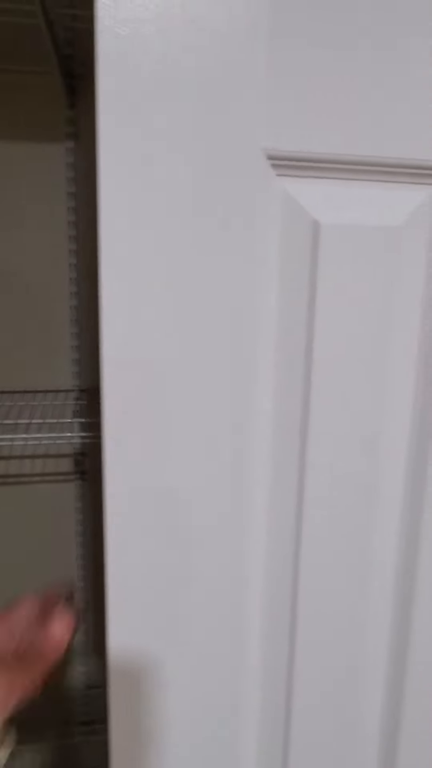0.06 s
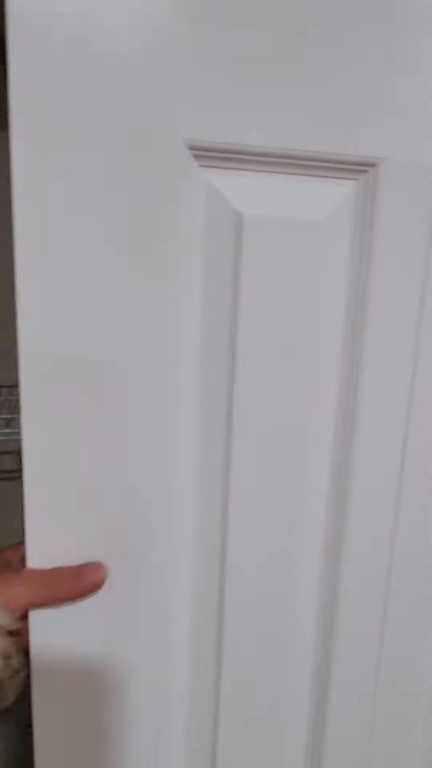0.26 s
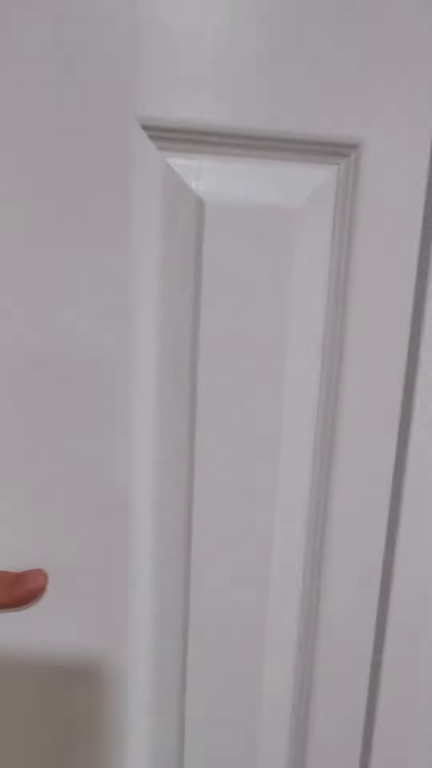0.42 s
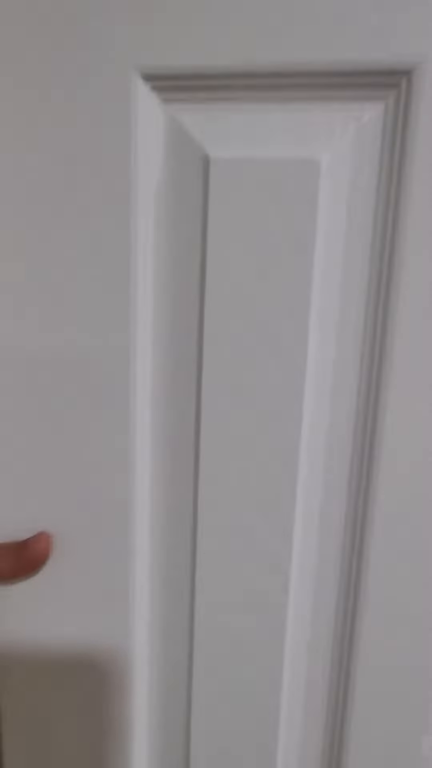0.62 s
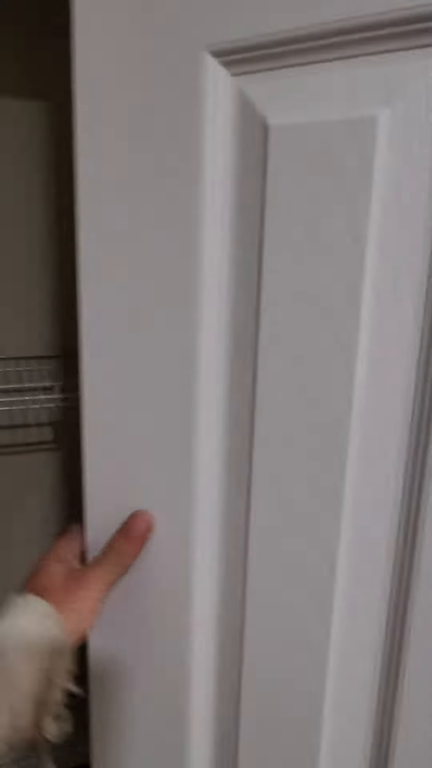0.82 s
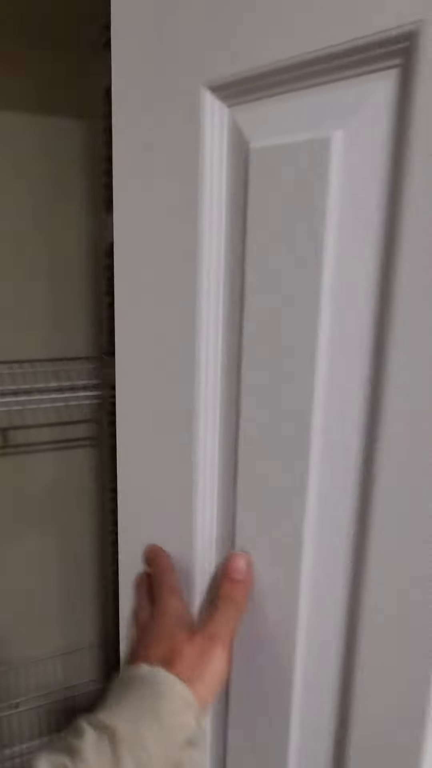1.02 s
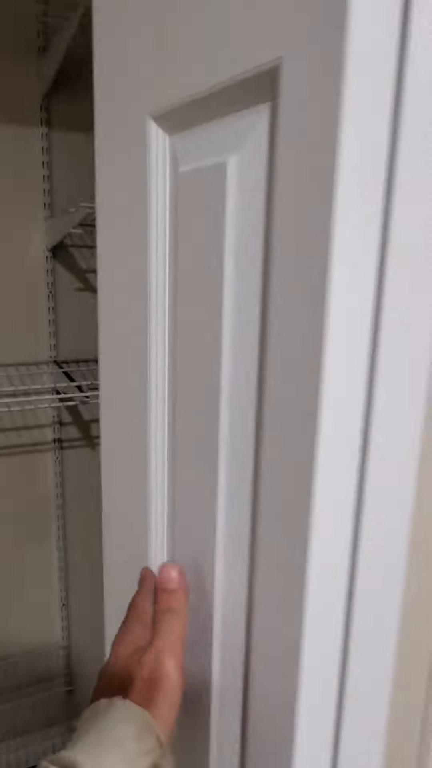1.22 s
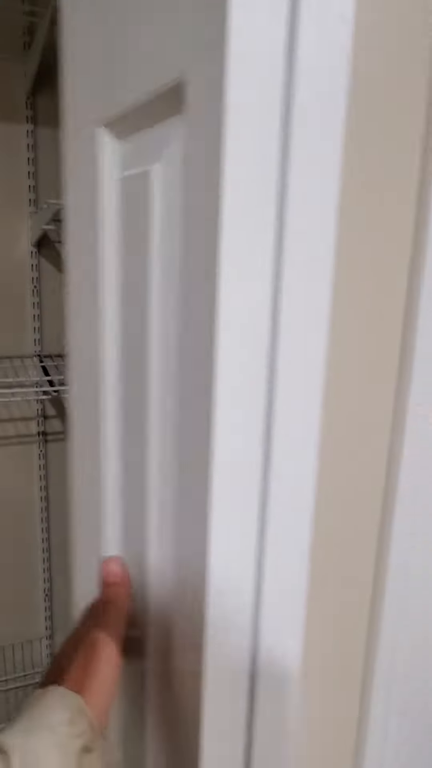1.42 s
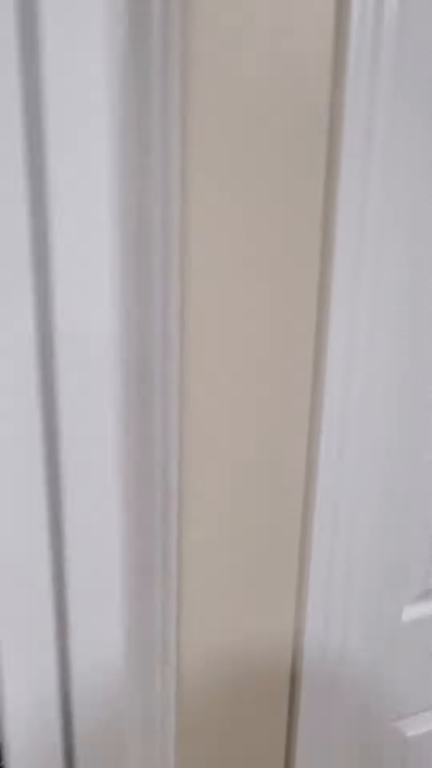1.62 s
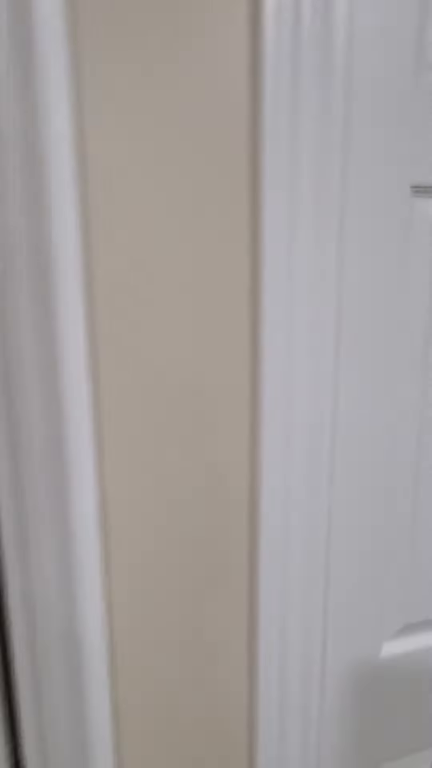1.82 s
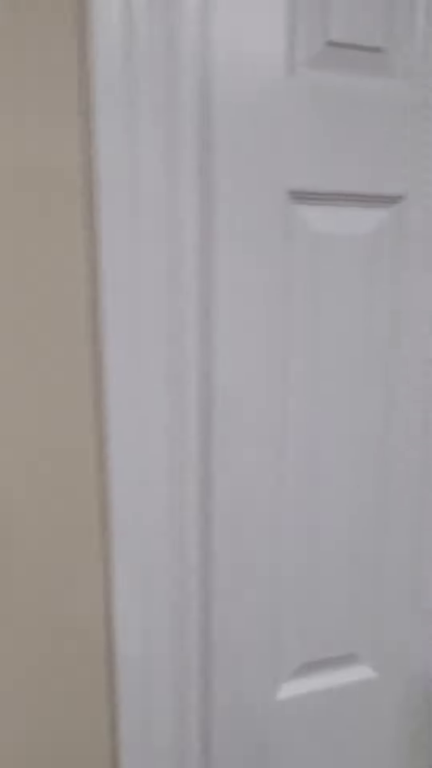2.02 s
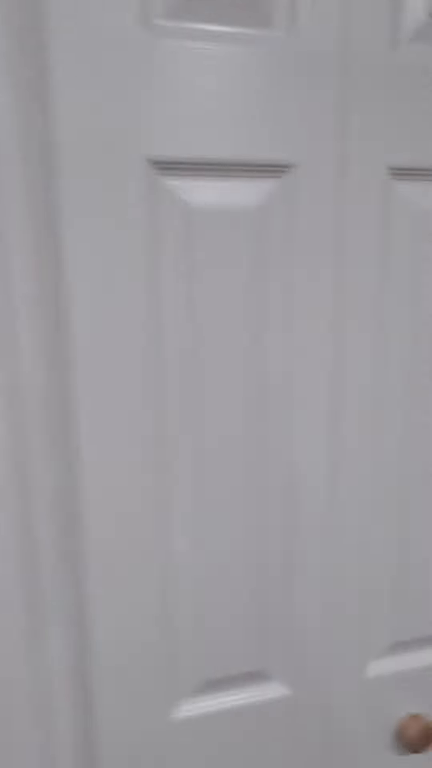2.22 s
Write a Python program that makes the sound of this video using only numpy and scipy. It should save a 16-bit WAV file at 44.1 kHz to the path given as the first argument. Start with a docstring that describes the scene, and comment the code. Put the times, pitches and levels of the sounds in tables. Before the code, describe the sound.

Folding closet door tugged open with a hollow thump, rattling slide, knocks and a metallic snap.

```python
"""A hollow bifold closet door is tugged open in a bare, ringing room.
The panels boom as they break free (0.2 s) and a hinge pin pings. The guide scrapes along its
track, shaking the panels; it catches (0.7 s) and groans (0.9 s). The leaves knock together as
they fold (1.4 s), a metal pivot snaps into place, its spring ringing on (1.7 s), and one light
knock follows (2.0 s)."""
import sys
import numpy as np
from scipy import signal
from scipy.fft import rfft, irfft
from scipy.io import wavfile

SR = 44100
rng = np.random.default_rng(int(sys.argv[2]) if len(sys.argv) > 2 else 0)


def pcm_store(signal):
    """Save signal as 16-bit PCM."""
    levels = np.round(np.clip(np.atleast_2d(signal), -1, 1) * 32767)
    wavfile.write(sys.argv[1], SR, levels.astype(np.int16).T)


N = 101430
T = np.arange(N) / SR
FREQS = np.maximum(np.fft.rfftfreq(N, 1 / SR), 1)


def knocks():
    """Blows ring the hollow panels; softness and place decide which modes answer."""
    # t/s, ring level/dB, boom level/dB, low-pass f/Hz, high-pass f/Hz
    blows = [(0.187, -26, -31.5, 90, 35), (0.2124, -13.5, -19, 604, 88), (.277, -37, -27, 910, 90),
             (.372, -44, -28.5, 109, 45), (0.496, -41, -35.5, 1200, 40), (.741, -35, -30, 400, 54.6),
             (1.013, -40, -46.5, 288, 40), (1.358, -27, -32.5, 1920, 250), (1.403, -28, -20, 183, 87.4),
             (1.406, -36, -30, 2500, 150), (1.445, -14, -31, 101, 49.6), (2.027, -62, -38.5, 3000, 184)]
    # panel modes: f/Hz, level/dB, t60/s
    panel_modes = [(63.5, -24, 0.32), (80.2, -16.5, 0.78), (182, -17, 0.32), (201.3, -7, 0.38),
                   (241.7, -9, 0.59), (277.6, 0.5, 0.39), (293, -9, 0.48), (343, -7.5, 0.27),
                   (437, -2.5, 0.34), (466, -14, 0.19), (485, -10.5, 0.71), (526, -17, 0.74),
                   (596, -40, .35), (651, -8.5, 0.32)]
    # dense ring of door and room: f/Hz, level/dB
    boom_spectrum = [(25, -7), (50, -1), (85, 3), (120, -12), (180, -9.5), (270, -6), (450, -8), (600, -11),
                     (1000, -17), (2000, -20), (5000, -41)]
    boom_boost_db = 4
    out = 0
    for start_s, ring_db, boom_db, lowpass_hz, highpass_hz in blows:
        contact = 1 / np.sqrt((1 + (FREQS / lowpass_hz) ** 4) * (1 + (highpass_hz / FREQS) ** 4))
        modes = [(hz, db + 20 * np.log10(np.interp(hz, FREQS, contact)), t60_s)
                 for hz, db, t60_s in panel_modes]
        panel = direct(ring(modes, start_s, rise_s=0.0043))
        boom = diffuse(colour(boom_spectrum) * contact) * fade(start_s, t60_s=0.76, rise_s=0.0027)
        out = out + amp(ring_db) * panel + amp(boom_db + boom_boost_db) * boom
    return out


def flexes():
    """A pushed or struck leaf bends as a whole for a few cycles, giving the blow its punch."""
    # t/s, level/dB, f/Hz, rise/s, t60/s
    bends = [(.001, -34.5, 59, 0.0018, 0.19), (0.188, -22, 77, .02, 0.18),
             (0.2134, 5.5, 246, 0.0052, 0.038), (0.2143, -10, 448.6, .006, 0.12),
             (.277, -18.5, 278.6, 0.0043, 0.28), (.48, -32, 75.6, 0.017, 0.19),
             (0.649, -23, 72.4, 0.047, 0.35), (.742, -22.5, 168.2, 0.004, 0.21),
             (1.01, -33.5, 79.7, .008, .2), (1.224, -24, 77, 0.055, 0.29), (1.355, -27, 283, 0.011, 0.18),
             (1.399, -15.5, 169, 0.0088, 0.27)]
    return direct(sum(ring([(hz, db, t60_s)], start_s, rise_s)
                      for start_s, db, hz, rise_s, t60_s in bends))


def clacks():
    """Leaf edges meet, wood on wood, with a short dry clack."""
    # t/s, level/dB
    contacts = [(0.2192, -27), (0.496, -28.5), (0.738, -27), (1.3555, -39), (1.362, -27.5), (1.395, -33),
                (1.7195, -33), (2.0276, -32.5)]
    # f/Hz, level/dB
    spectrum = [(100, -14), (220, -2), (520, -1), (800, -1.5), (1500, -3), (2200, -10), (5000, -9),
                (15000, -40)]
    envelope = sum(amp(db) * fade(start_s, t60_s=0.065, rise_s=0.0013) for start_s, db in contacts)
    return diffuse(colour(spectrum)) * envelope


def pivot():
    """The metal pivot snaps home with a double contact; its spring and the room ring on."""
    # t/s, level/dB
    contacts = [(1.719, -14), (1.7199, -3.5)]
    # f/Hz, level/dB, t60/s
    pivot_modes = [(3410, -0.5, 0.0089), (3930, -3.5, 0.01), (5760, -7, 0.0084), (6240, -6.5, 0.0053),
                   (10500, -5, 0.0025), (14000, -5, 0.0041)]
    # f/Hz, level/dB, t60/s
    spring_modes = [(3060, -0.5, 0.55), (3390, -1, 0.75), (3310, 2, 0.89), (3353, -12, 0.72),
                    (3485, -10, 0.77), (3520, -12, 0.67), (3740, -7, 0.97), (3977, -12, 1.0),
                    (5500, -11, 0.99), (5803, -11, 1)]
    # f/Hz, level/dB
    tail_spectrum = [(150, -27), (500, -13), (1400, -11), (2300, -13.5), (2950, -6), (3260, 3.5),
                     (3650, -1.5), (3830, -4), (4030, -4.5), (4400, -8.5), (5000, -5), (5550, -4),
                     (6200, -11.5), (6700, -10), (7300, -13), (7750, -12.5), (8800, -20), (10700, -17),
                     (11700, -21), (13750, -11.5), (15000, -17), (16000, -26)]
    first_s = contacts[0][0]
    snap = sum(amp(db) * ring(pivot_modes, start_s, rise_s=0.00035) for start_s, db in contacts)
    spring = amp(-34) * ring(spring_modes, first_s, rise_s=0.001) * pan(left_db=2)
    tail = amp(-22) * room_tail(click(first_s, colour(tail_spectrum)))
    return direct(snap, left_db=11.5) + spring + tail


def ticks():
    """Play in the pivots and hinges makes them click."""
    # t/s, crack level/dB, room level/dB, tilt/(dB/octave), left-right/dB
    events = [(.103, -57, -61.5, -11.5, -7), (.191, -45, -47.5, -7.5, 3), (0.2053, -48, -52, 10, 6),
              (.2216, -25.5, -41, 0, 12), (.2745, -22.5, -40, -6, 1.5), (.494, -34, -45.5, -4.5, 8),
              (0.504, -33, -55, -3, 5), (1.3648, -22.5, -41, 4, -2), (1.3968, -21.5, -33.5, -4.5, 10.5),
              (1.4025, -23, -50, -6, -2), (1.408, -26, -50, -5, -5), (1.638, -37, -51.5, -6, 6)]
    # f/Hz, level/dB
    spectrum = [(300, 0), (1200, -4.5), (2500, -0.5), (3600, 5), (5000, 1.5), (6800, -1.5), (8500, -9),
                (11500, -5), (15500, -3.5)]
    return cracks(events, spectrum)


def catches():
    """The guide clicks as it catches in the track."""
    # t/s, crack level/dB, room level/dB, tilt/(dB/octave), left-right/dB
    events = [(.6785, -25.5, -47, -1.5, 3), (.734, -20.5, -39.5, -3, 4.5), (1.0125, -34, -46.5, 1, 2)]
    # f/Hz, level/dB
    spectrum = [(500, -14), (1800, -6), (2800, -16), (3700, 1), (4250, -5), (4700, 9.5), (5300, -4.5),
                (6000, 5), (6800, -4), (8200, -8), (15500, -9)]
    return cracks(events, spectrum)


def hinge_ping():
    """A hinge pin slips with a thin ping."""
    # f/Hz, level/dB
    spectrum = [(2500, -31), (4600, -7), (5600, 2.5), (6100, -1), (6900, 4), (8100, -3), (9500, -1.5),
                (10300, 1), (10900, -6), (11700, 4), (12800, -6), (13500, 0), (15500, -1)]
    start_s, crack_db, room_db, tilt_db_per_oct, left_db = 0.3085, -20, -32.5, 0, -10
    return cracks([(start_s, crack_db, room_db, tilt_db_per_oct, left_db)], spectrum)


def cracks(events, spectrum):
    """Hardware contacts: short noise bursts, each with its wash in the room."""
    bursts, room_feed = 0, 0
    treble_oct = np.log2(np.maximum(FREQS, 1500) / 5000)
    for start_s, crack_db, room_db, tilt_db_per_oct, left_db in events:
        gain = colour(spectrum) * amp(tilt_db_per_oct * treble_oct)
        burst = 2 * shape(rng.standard_normal(N), gain) * fade(start_s, t60_s=0.009, rise_s=0.0006)
        bursts = bursts + amp(crack_db) * direct(burst, left_db)
        room_feed = room_feed + amp(room_db) * click(start_s, gain)
    return bursts + room_tail(room_feed)


def scrape():
    """The guide rubs grainily along the track."""
    # t/s, level/dB
    levels = [(.18, -83), (.24, -54), (.45, -50), (.58, -51), (.7, -40.5), (.77, -40.5), (.86, -37.5),
              (.92, -43), (1.0, -43), (1.035, -38), (1.16, -42), (1.32, -47), (1.45, -46), (1.7, -72),
              (2.3, -58.5)]
    # f/Hz, level/dB
    spectrum = [(500, -14), (2000, 2.5), (2800, -7.5), (3600, 2), (4250, 0.5), (4750, 5), (5500, 1.5),
                (6800, -0.5), (8200, -5), (9700, -6), (11000, -4), (15500, -4.5)]
    grain_db = 1.5 * jitter(rate_hz=500)
    return diffuse(colour(spectrum)) * amp(grain_db) * curve(levels) * pan(left_db=0.5)


def shudder():
    """The panels shake as they travel."""
    # t/s, level/dB
    levels = [(.15, -84), (.35, -37.5), (.6, -40.5), (.72, -36.5), (.87, -38.5), (.98, -40), (1.15, -40),
              (1.3, -38.5), (1.62, -41), (1.8, -40.5), (1.95, -63), (2.3, -68)]
    # f/Hz, level/dB
    spectrum = [(30, -31), (60, -4), (120, -8.5), (175, -1.5), (290, 0), (410, 1), (560, -7), (900, -11),
                (1800, -11), (2700, -20.5), (6000, -35)]
    return diffuse(colour(spectrum)) * curve(levels)


def groan():
    """The guide sticks briefly and sets one panel resonance humming unsteadily."""
    centre_s, sigma_s = 0.885, 0.042
    pitch_hz = 408 + 15.3 * jitter(rate_hz=90)
    hum = np.sin(2 * np.pi * np.cumsum(pitch_hz) / SR)
    swell = np.exp(-((T - centre_s) / sigma_s) ** 2 / 2)
    return direct(amp(-34.5) * hum * swell, left_db=-2.4)


def room_tail(clicks):
    """Clicks reverberate in the bare room, the treble dying first."""
    # f/Hz, t60/s
    decay_times = [(100, 1.4), (1000, 1.43), (3300, 1.06), (6000, 1.04), (9000, 0.91), (15000, 0.47)]
    hz, t60s_s = np.array(decay_times).T
    wash = rfft(diffuse(0.99))
    bands = [np.interp(np.log(FREQS), np.log(hz), row) for row in np.eye(len(hz))]
    response = sum(irfft(wash * band, N) * fade(0, t60_s, rise_s=0.001)
                   for band, t60_s in zip(bands, t60s_s))
    return signal.fftconvolve(response, clicks[None], axes=1)[:, :N]


def room_tone():
    """Faint steady noise of the quiet room."""
    # f/Hz, level/dB
    spectrum = [(25, -21), (62, -8.5), (110, -5.5), (400, -16), (900, -10), (2000, -19), (4500, -27.5),
                (8000, -40.5), (16000, -46)]
    return amp(-52.5) * diffuse(colour(spectrum))


def diffuse(gain):
    """Noise from all around: bass common to both sides, treble unrelated and mostly leaning left."""
    # f/Hz, left-right/dB
    balance = [(500, 0.1), (1100, -0.5), (2200, -0.5), (4500, 4), (8000, -1), (13000, 7)]
    common_below_hz = 530
    mid, side = rfft(rng.standard_normal((2, N))) * gain
    spread = np.clip(FREQS ** 2 / (FREQS ** 2 + common_below_hz ** 2) + 0.021, 0, 1)
    mid, side = mid * np.sqrt(1 - spread / 2), side * np.sqrt(spread / 2)
    hz, left_db = np.array(balance).T
    lean = amp(np.interp(np.log(FREQS), np.log(hz), left_db) / 2)
    return irfft(np.array([(mid + side) * lean, (mid - side) / lean]), N)


def direct(x, left_db=0):
    """Sound straight from the door arrives on the left first."""
    right_lag_s = 0.000402
    return np.array([x, np.interp(T - right_lag_s, T, x)]) * pan(left_db)


def ring(modes, start_s, rise_s):
    """Decaying modes set off together."""
    out = np.zeros(N)
    for hz, db, t60_s in modes:
        span = slice(*np.searchsorted(T, [start_s, start_s + t60_s]))
        tone = np.sin(2 * np.pi * hz * (T[span] - start_s))
        out[span] += amp(db) * tone * fade(start_s, t60_s, rise_s)[span]
    return out


def fade(start_s, t60_s, rise_s):
    """Quick rise, exponential decay."""
    age_s = np.maximum(T - start_s, 0)
    return (1 - np.exp(-age_s / rise_s)) * np.exp(-np.log(1000) * age_s / t60_s)


def click(start_s, gain):
    """One coloured impulse."""
    return shape(signal.unit_impulse(N, int(start_s * SR)), gain)


def jitter(rate_hz):
    """Gaussian random values joined by straight lines."""
    return np.interp(T * rate_hz, np.arange(N), rng.standard_normal(N))


def colour(rows):
    """Unit-power gain over frequency from rows of f/Hz, level/dB."""
    hz, db = np.array(rows).T
    gain = amp(np.interp(np.log(FREQS), np.log(hz), db))
    return gain / np.sqrt(np.mean(gain ** 2))


def curve(rows):
    """Gain over time from rows of t/s, level/dB."""
    return amp(np.interp(T, *np.array(rows).T))


def shape(x, gain):
    """Filter by a gain per frequency."""
    return irfft(rfft(x) * gain, N)


def pan(left_db):
    """Left and right gains."""
    return amp(np.array([[left_db], [-left_db]]) / 2)


def amp(db):
    """Decibels to gain."""
    return 10 ** (np.asarray(db) / 20)


def scene():
    """Wood, hardware and sliding over the quiet room."""
    wood = knocks() + flexes() + clacks()
    hardware = ticks() + catches() + hinge_ping() + pivot()
    sliding = scrape() + shudder() + groan()
    return wood + hardware + sliding + room_tone()


def record(dry):
    """High-pass, peak clip, steep low-pass."""
    highpass_hz, ceiling, lowpass_hz = 10, 0.88, 15900
    highpass = signal.butter(2, highpass_hz, "high", fs=SR, output="sos")
    lowpass = signal.ellip(10, 0.2, 80, lowpass_hz, fs=SR, output="sos")
    clipped = np.clip(signal.sosfilt(highpass, dry), -ceiling, ceiling)
    return signal.sosfilt(lowpass, clipped)


dry = scene()
out = record(dry)
pcm_store(out)
```